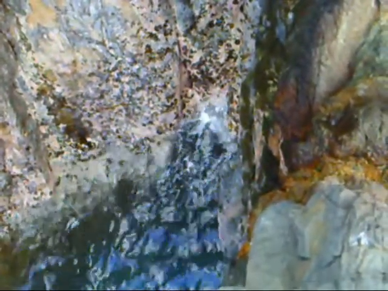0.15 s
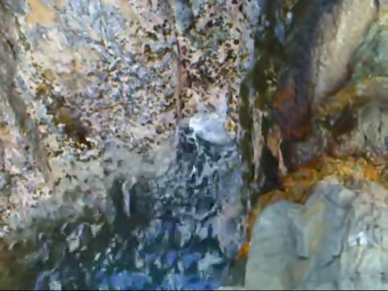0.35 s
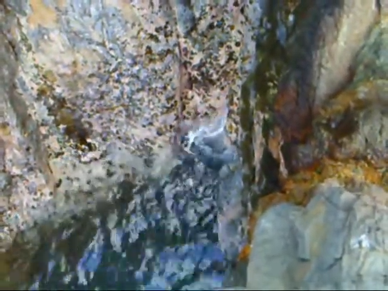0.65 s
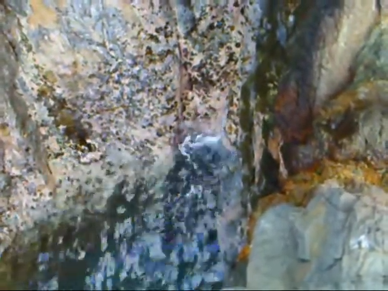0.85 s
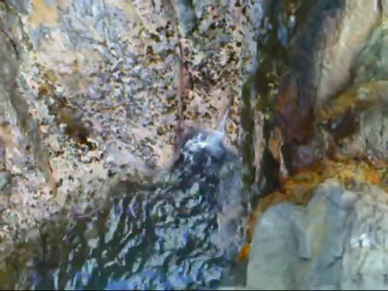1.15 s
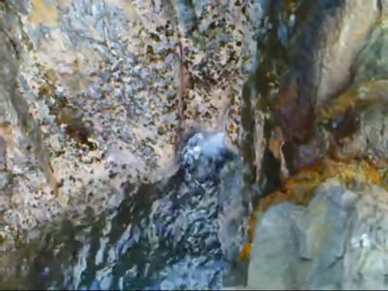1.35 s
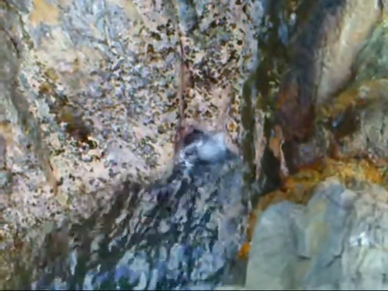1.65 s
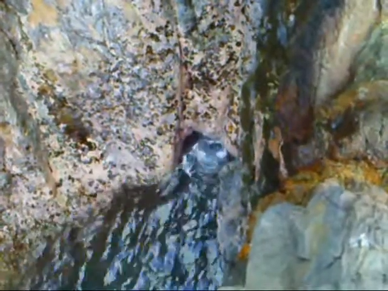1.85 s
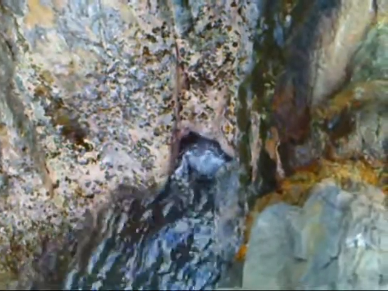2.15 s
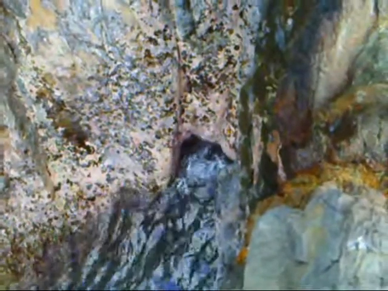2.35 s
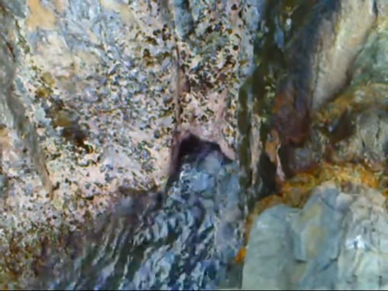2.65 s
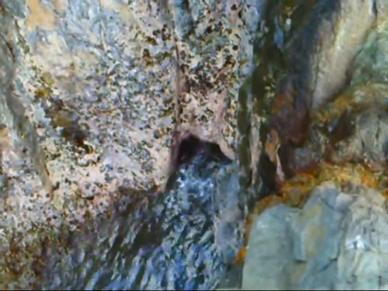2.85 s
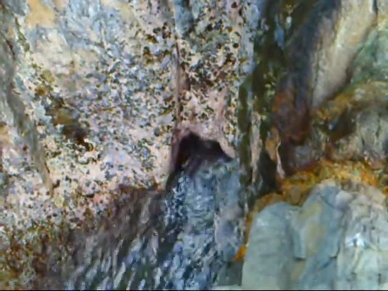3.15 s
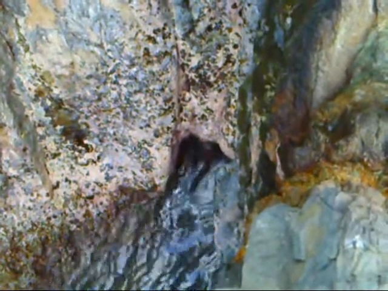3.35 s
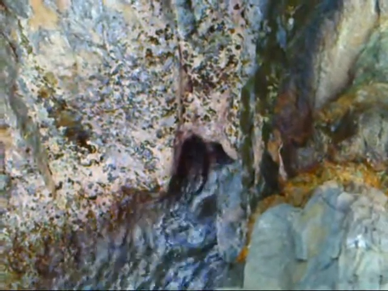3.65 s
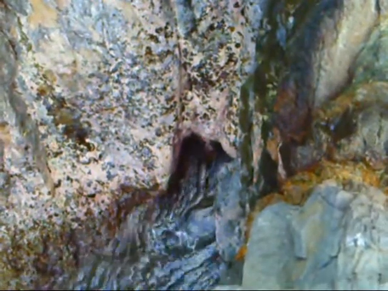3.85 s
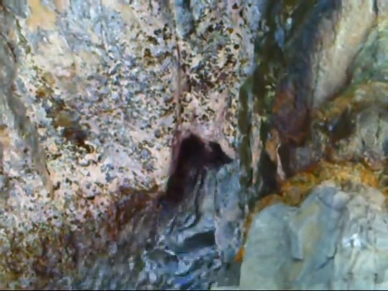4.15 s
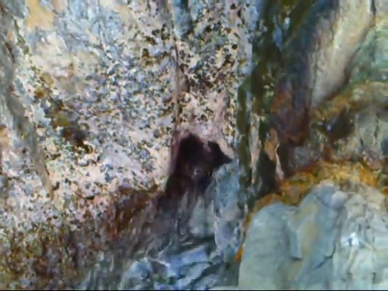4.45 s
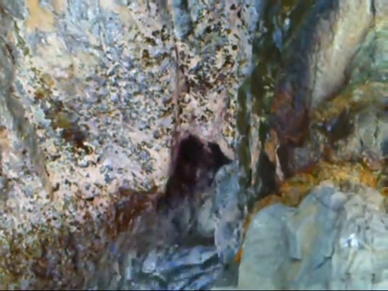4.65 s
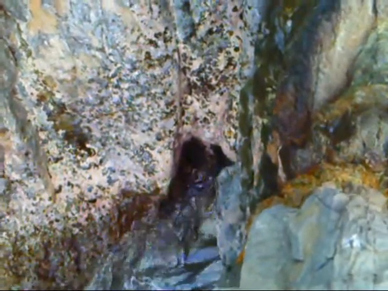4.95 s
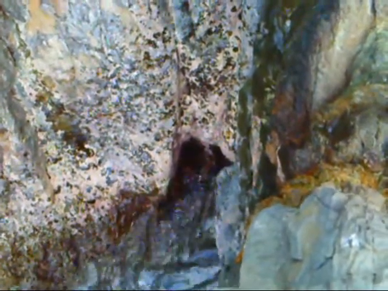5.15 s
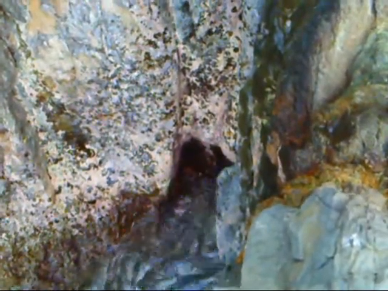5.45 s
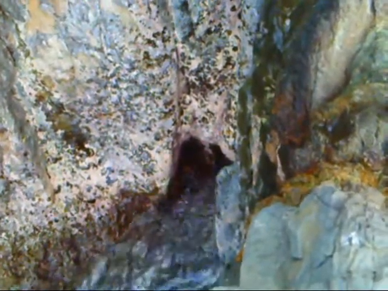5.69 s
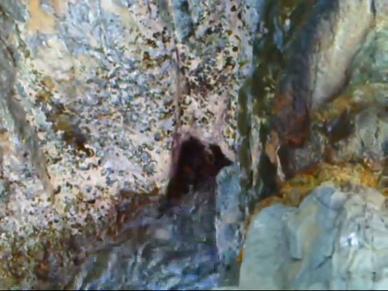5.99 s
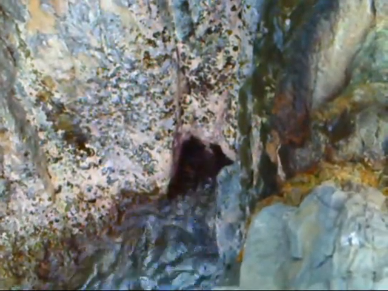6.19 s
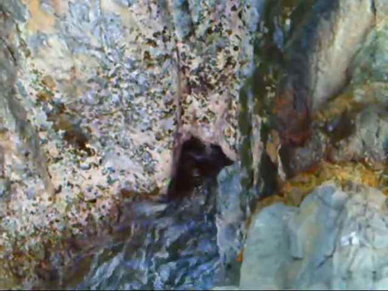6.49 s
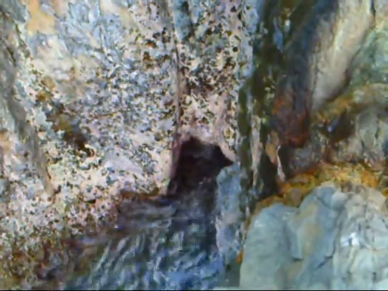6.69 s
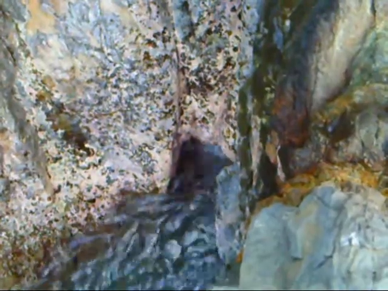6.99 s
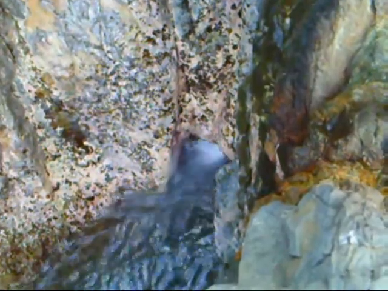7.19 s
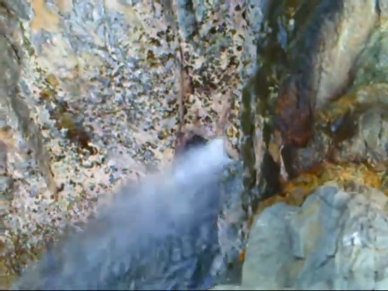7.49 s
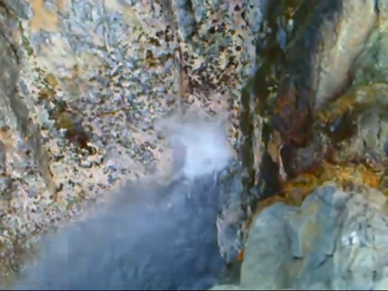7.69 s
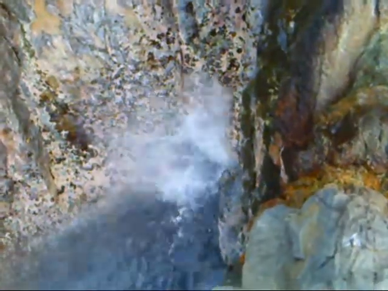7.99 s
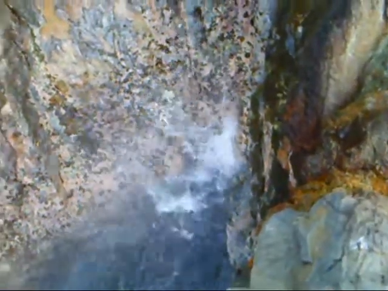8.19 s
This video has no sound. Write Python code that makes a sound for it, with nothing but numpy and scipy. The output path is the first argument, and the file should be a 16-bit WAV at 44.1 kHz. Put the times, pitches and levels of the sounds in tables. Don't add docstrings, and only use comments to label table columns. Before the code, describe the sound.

Seawater moves in a narrow rock inlet with a small cave behind it, heard close on a bare, dull-sounding camera microphone with no high treble. From the start, bubbly mid-pitched foam churns continuously over a hollow low boom and a light spray hiss, while wind rumbles in soft thuds, strongest early. Short gulps come around 0.9, 2.1 and 3.3 s. The churn swells to about 3.4 s, then eases by 4.7 s, with rounder gulps near 4.8 and 5.2 s. Hard clicks fall about once a second from the first instant, with faint ticks between; at 5 s the sound vanishes for a blink. From 6 s slaps gather and wind gusts return near 6.5 s. At 6.8 s a wave slams into the cave with a low thump, gulps following to 7.4 s. Around 7.8 s spray rains down in a broader hiss, churning on past the strongest click at 8 s to the end, at 8.3 s.

```python
import sys
import numpy as np
from scipy import signal
from scipy.fft import rfft, irfft, next_fast_len
from scipy.io import wavfile
from scipy.ndimage import uniform_filter1d, map_coordinates

SR = 44100
rng = np.random.default_rng(int(sys.argv[2]) if len(sys.argv) > 2 else 0)


def unload_wav(signal):
    wavfile.write(
        sys.argv[1],
        SR,
        np.round(np.clip(np.atleast_2d(signal).T, -1, 1) * 32767).astype(np.int16),
    )


def ratio(d):
    e = np.asarray(d, float) / 20
    return 10 ** e


N = 367353

# [t/s, level/dB]
BREEZE = [(0, -34.5), (1.4, -38), (3.5, -40.5), (4.3, -44), (5.8, -47), (6.4, -40.5), (8.33, -40)]
# [t/s, rise/dB, half length/s]
GUSTS = [(0, 8.5, 0.094), (.5, 5.5, .05), (.93, 8.5, 0.23), (1.95, 8.5, .25), (2.8, 11.5, .1),
         (3.3, 7, .06), (4.47, 6, .05), (5, 6, .1), (6.2, 0, .06), (6.52, 15.5, 0.073), (6.84, 9.5, 0.081),
         (7.05, 12, .06), (7.55, 2, 0.073), (7.88, 7.5, 0.086)]
# [t/s, churn level/dB]
SWELL = [(0, -20.5), (.5, -23), (1, -23), (1.3, -21), (2, -19.5), (2.6, -19.5), (3.4, -18.5), (4, -20),
         (4.7, -22.5), (5.1, -21.5), (5.85, -22), (6.3, -20), (6.7, -20), (7.25, -18.5), (7.9, -19.5),
         (8.33, -21)]
# [t/s, rise/dB, half length/s]
SLAPS = [(.38, 1, 0.095), (1.25, 0.5, 0.048), (2.2, 0.5, 0.11), (3, 0, 0.064), (3.9, 0, 0.12),
         (5.6, 1, 0.076), (6.02, 1.5, 0.058), (6.53, 2.5, 0.1), (6.83, 3.5, 0.085), (7.13, 3.5, 0.066),
         (7.44, 1.5, 0.15), (7.76, 1, 0.046), (8.09, 2, 0.075)]
# [f/Hz, level per Hz/dB]
WIND_SPECTRUM = [(10, -15), (25, -7), (60, -3.5), (100, -1.5), (170, -29), (400, -98)]
CAVE_SPECTRUM = [(40, -35.5), (90, -10.5), (140, -2), (220, -0.5), (340, 1), (450, -4), (800, -10.5),
                 (2000, -79)]
CHURN_SPECTRUM = [(200, -39), (400, -8), (650, -8), (1050, -5.5), (1300, -10.5), (1800, -23), (3500, -65)]
SPRAY_SPECTRUM = [(700, -39.5), (1300, -0.5), (1900, -2.5), (2600, -3.5), (3300, -4), (3700, -9.5),
                  (4100, -23.5), (4300, -42.5)]
# [t/s, start f/Hz, rise ratio, length/s, level/dB]
GULPS = [(.93, 329, 0.99, 0.074, -28), (2.12, 93.7, 1.25, 0.16, -25.5), (2.78, 69, 0.97, 0.075, -35),
         (3.05, 347, 1.05, 0.097, -27), (3.3, 345, 0.79, .12, -18), (4.8, 234.3, 0.97, 0.044, -21),
         (4.86, 460.5, 1.05, .07, -17), (5.19, 613, 0.99, .06, -21.5), (5.24, 800, 1.25, 0.048, -24),
         (6.12, 159, 0.98, .07, -23.5), (6.4, 121, 1.03, 0.11, -24), (6.5, 783, 1, 0.09, -22),
         (6.09, 387.4, 1.5, .2, -20), (6.81, 142, 1.1, .11, -15.5), (6.8, 421, 1.6, 0.03, -21),
         (6.81, 610, 1.37, .06, -27), (6.82, 980, 0.88, 0.083, -35), (7.08, 302, 1.2, 0.062, -28),
         (7.34, 437, 0.98, 0.056, -14.5), (7.43, 332, 0.97, .1, -18.5)]
# [t/s, share 0-1]
NARROWING = [(0, 0), (5, 0), (5.04, 1), (7.2, 1), (7.45, 0), (8.33, 0)]
JOIN_STEPS = [
    .21,
    .07,
    .17,
    .31,
    -.17,
    0,
    .17,
    .005,
    .4,
]
# [from t/s, to t/s, level/dB]
SMEARS = [
    (4.965, 5.025, -66),
    (4.99, 5.03, -66),
    (5.017, 5.032, -56),
    (5.025, 5.039, -40),
    (6.98, 7.07, -66),
    (7.015, 7.035, -65),
    (.965, 1.045, -69),
    (1.985, 2.02, -62),
    (8.008, 8.035, -60),
]
# [t/s, peak level/dB]
TICKS = [(3.53, -68.5), (1.2217, -65), (1.974, -65.5), (2.85, -73.5), (4.66, -72), (7.287, -71),
         (8.008, -64.5), (1.5386, -65), (1.8488, -63.5), (2.2622, -75), (2.7097, -66.5), (2.732, -79),
         (3.1977, -67), (3.344, -65.5), (3.6146, -67), (4.3827, -65.5), (4.561, -75.5), (4.822, -51.5),
         (7.4693, -73.5), (7.5098, -58), (7.5171, -60), (7.6192, -69), (7.7423, -66.5), (7.7665, -73.5),
         (7.8171, -75.5), (7.927, -61), (7.9339, -58), (7.995, -57)]
DROPOUT_EDGES = [
    -.06,
    -.075,
]

CAVE_UNDER_DB, CAVE_GROWS = 4.5, 1.1
SPRAY_UNDER_DB, SPRAY_GROWS = 10.5, 0.9
CAVE_SLAP, SPRAY_SLAP, CHURN_LAG_S = 1.63, 1.42, .015
SLAM = [(6.805, 3.5, .025)]
MIST = [(7.77, 3, 0.34)]
TOP_HZ, NARROWER_HZ, WAVER_HZ = 4205, 145, 70
BLOCK_S, FIRST_JOIN_S, LOST_S, LOST_AT = .9979, .0055, .0333, 5
TWIN_S, TWIN_DB = .007, -9
OFFSET = .006
CLICK_TOP_HZ = 12750
EDGE = 200
HEAL = np.exp(-np.arange(EDGE) / SR / .0003)


def unit(x):
    return x / np.sqrt(np.mean(x ** 2) + 1e-20)


def curve(points):
    return np.interp(np.arange(N) / SR, *np.transpose(points))


def bumps(rows, lag_s=0):
    t = np.arange(N) / SR
    return sum(db * np.exp(-((t - s - lag_s) / half) ** 2) for s, db, half in rows)


def wobble(rate):
    knots = rng.standard_normal(int(N * rate / SR) + 4)
    return map_coordinates(knots, [np.arange(N) * rate / SR])


def filtered(x, response):
    m = next_fast_len(N + 8192)
    return irfft(rfft(x, m) * response(np.fft.rfftfreq(m, 1 / SR)), m)[:N]


def coloured(x, points):
    f, db = np.transpose(points)
    return unit(filtered(x, lambda hz: ratio(np.interp(np.log(hz + 1), np.log(f), db))))


def patchy(patchy_db):
    z = signal.stft(rng.standard_normal(N + 1024), nperseg=1024)[2]
    field = uniform_filter1d(rng.standard_normal(z.shape), size=7, axis=0)
    field = uniform_filter1d(field, size=6, axis=1)
    return unit(signal.istft(z * ratio(patchy_db * unit(field)), nperseg=1024)[1][:N])


def wind():
    level_db = curve(BREEZE) + bumps(GUSTS) - 1.5 + 1.2 * wobble(6.5)
    return ratio(level_db) * coloured(patchy(patchy_db=-0.2), WIND_SPECTRUM)


def cave_boom(mean_db, swell_db, throb):
    level_db = mean_db - CAVE_UNDER_DB + CAVE_GROWS * swell_db + CAVE_SLAP * bumps(SLAPS) + bumps(SLAM)
    return ratio(level_db + 0.2 * throb) * coloured(patchy(patchy_db=-0.14), CAVE_SPECTRUM)


def bubbles(count, centre_hz, spread, cycles, scatter_db):
    draw, size = rng.random((count, 2)), 1200
    hz = centre_hz * np.exp(spread * rng.standard_normal((count, 1)))
    turns = hz * np.arange(size) / SR
    age = turns / cycles
    shape = age * np.exp(-age * 3) * np.hanning(2 * size)[size:]
    loudness = ratio(-scatter_db * np.log(draw[:, 1:]))
    ring = shape * np.sin(2 * np.pi * turns * (1 + .12 * age)) * loudness
    where = (draw[:, :1] * N).astype(int) + np.arange(size)
    return unit(np.bincount(where.ravel(), ring.ravel(), N + size)[:N])


def churn(mean_db, swell_db, throb):
    level_db = mean_db + swell_db + bumps(SLAPS, CHURN_LAG_S) + bumps(SLAM)
    cloud = bubbles(count=3500, centre_hz=800, spread=0.4414, cycles=8.64, scatter_db=0.5)
    foam = patchy(patchy_db=-0.25) + 0.12 * cloud
    return ratio(level_db + throb) * coloured(foam, CHURN_SPECTRUM)


def spray(mean_db, swell_db, throb):
    level_db = mean_db - SPRAY_UNDER_DB + SPRAY_GROWS * swell_db + SPRAY_SLAP * bumps(SLAPS) + bumps(MIST)
    return ratio(level_db + 0.27 * throb) * coloured(patchy(patchy_db=0.6), SPRAY_SPECTRUM)


def surge():
    swell = curve(SWELL)
    mean_db = np.mean(swell)
    swell_db = swell - mean_db
    throb = .5 * wobble(7) + 0.14 * wobble(32) + 0.42 * wobble(45)
    drive = mean_db, swell_db, throb
    return cave_boom(*drive) + churn(*drive) + spray(*drive)


def gulps():
    out = np.zeros(N)
    for s, hz, rise, length, db in GULPS:
        u = np.linspace(-1, 1, round(2 * length * SR))
        knots_at = np.linspace(-1, 1, 40)
        shiver, flutter = (np.interp(u, knots_at, knots) for knots in rng.standard_normal((2, 40)))
        pitch = hz * rise ** (u + .5) * (1 + .13 * shiver)
        level = ratio(db - 0.3 + 3.3 * flutter) * np.exp(-4.5 * u ** 2)
        ring = level * np.sin(2 * np.pi * np.cumsum(pitch) / SR)
        out[round((s - length) * SR):][:len(u)] += ring
    return out


def scene():
    return (wind() + surge() + gulps())[None]


def preamplifier(x):
    return x / (1 + np.abs(x / .9) ** 4) ** (1 / 4)


def banded(x):
    hz, t, z = signal.stft(x, SR, nperseg=2048)
    at = np.minimum(t * SR, N - 1).astype(int)
    narrow = curve(NARROWING)[at]
    edge = TOP_HZ - narrow * NARROWER_HZ + WAVER_HZ * (.4 + .6 * narrow) * wobble(18)[at]
    return signal.istft(z * (hz[:, None] < edge), SR, nperseg=2048)[1][:N]


def join_blocks(x):
    for k, step in enumerate(JOIN_STEPS):
        at = round((FIRST_JOIN_S + k * BLOCK_S + (k > LOST_AT) * LOST_S) * SR)
        x[at:at + EDGE] += step / 2 * HEAL
        x[at - EDGE:at] -= step / 2 * HEAL[::-1]


def smear(x):
    tone = [(500, 4), (4000, 0), (5000, -4), (6500, -12), (12500, -19), (13000, -45)]  # f/Hz, level/dB
    fizz = coloured(rng.standard_normal(N), tone)
    for start, end, db in SMEARS:
        a, b = round(start * SR), round(end * SR)
        x[a:b] += ratio(db) * np.sqrt(np.hanning(b - a)) * fizz[a:b]


def tiny_ticks():
    s, db = np.transpose(TICKS)
    peak = ratio(np.clip(db, -72, -54) + 41)
    twin_s = s + TWIN_S * rng.uniform(-2, 1, len(s))
    ticks = np.bincount(np.round(s * SR).astype(int), peak, N)
    ticks += ratio(TWIN_DB) * np.bincount(np.round(twin_s * SR).astype(int), peak, N)
    return filtered(ticks, lambda hz: (hz > 3800) / (1 + (hz / 4200) ** 9))


def drop_out(x):
    lost = FIRST_JOIN_S + LOST_AT * BLOCK_S
    a, b = round(lost * SR), round((lost + LOST_S) * SR)
    x[a - EDGE:a] += (DROPOUT_EDGES[0] - x[a - 1]) * HEAL[::-1]
    x[b:b + EDGE] += (DROPOUT_EDGES[1] - x[b]) * HEAL
    x[a:b] = ratio(-36) * (x[a:b] + OFFSET)


def low_pass(x):
    return signal.sosfilt(signal.butter(12, 16000, fs=SR, output="sos"), x)


def record(dry):
    x = banded(preamplifier(dry[0])) - OFFSET
    x += tiny_ticks()
    join_blocks(x)
    drop_out(x)
    x = filtered(x, lambda hz: .99 / (1 + (hz / CLICK_TOP_HZ) ** 80) + .01 * (hz < 15500))
    smear(x)
    x[-300:] *= np.hanning(600)[300:]
    return low_pass(x[None])


dry = scene()
out = record(dry)
unload_wav(out)
```